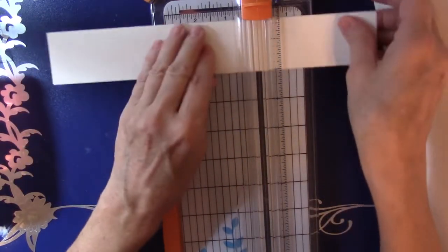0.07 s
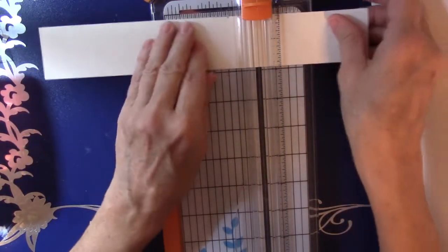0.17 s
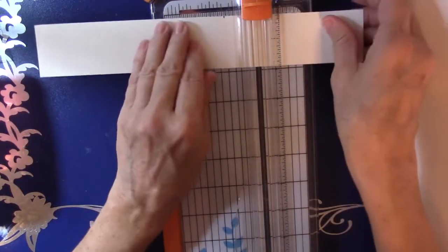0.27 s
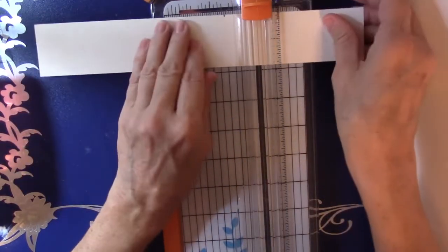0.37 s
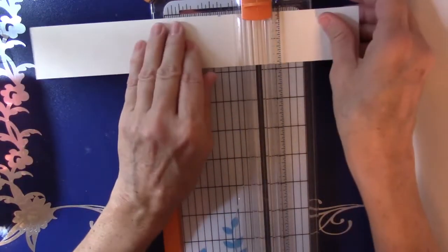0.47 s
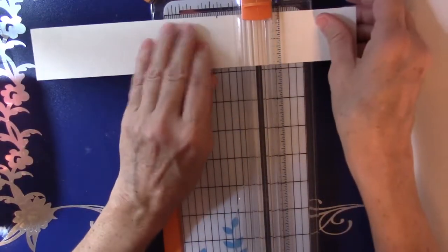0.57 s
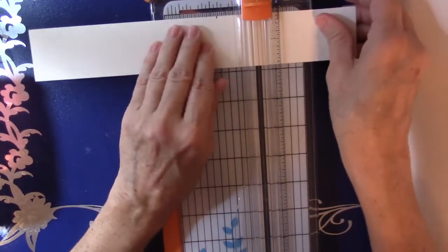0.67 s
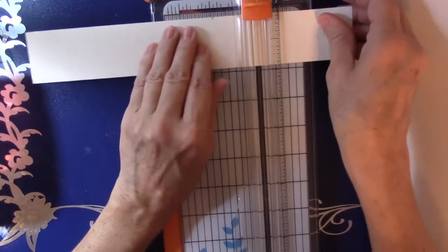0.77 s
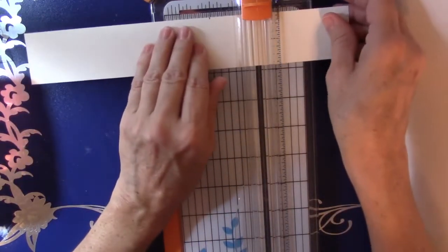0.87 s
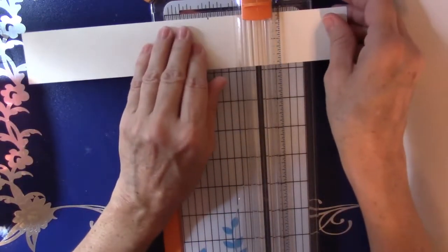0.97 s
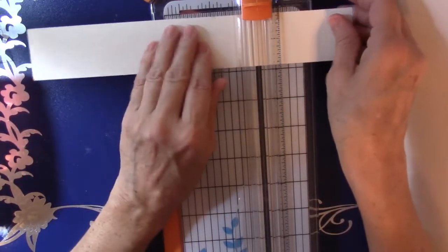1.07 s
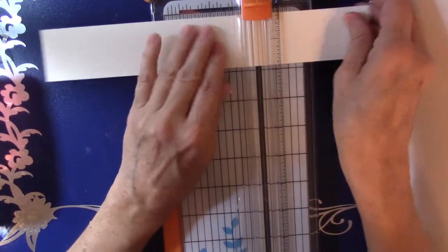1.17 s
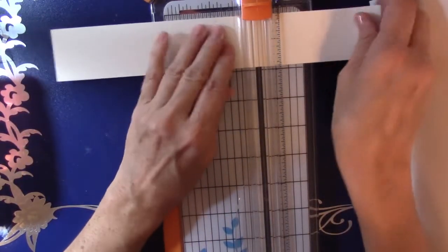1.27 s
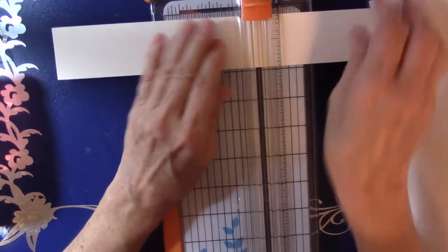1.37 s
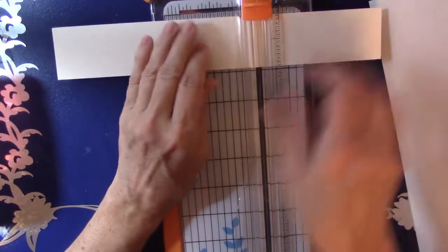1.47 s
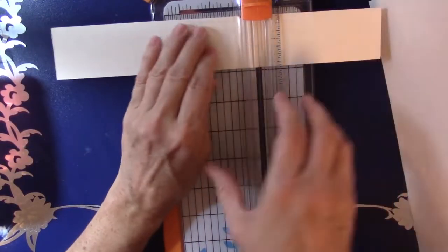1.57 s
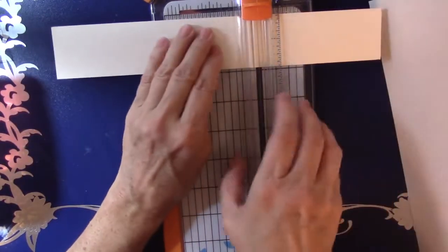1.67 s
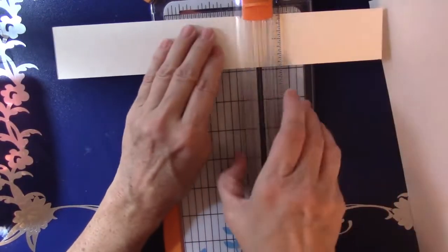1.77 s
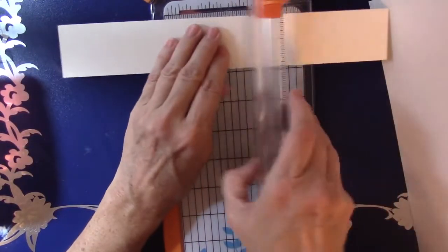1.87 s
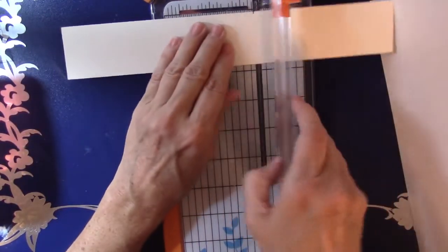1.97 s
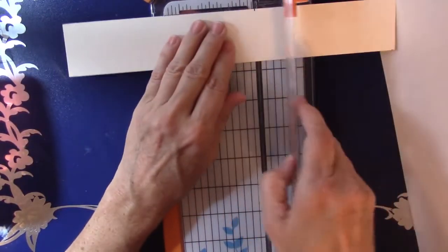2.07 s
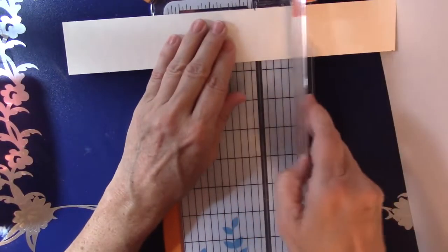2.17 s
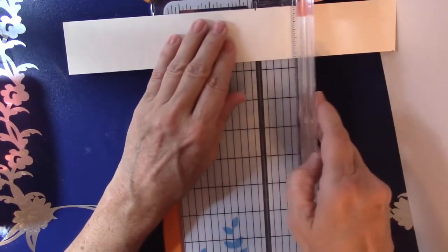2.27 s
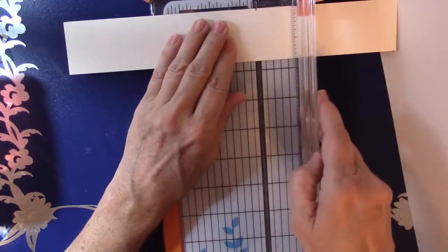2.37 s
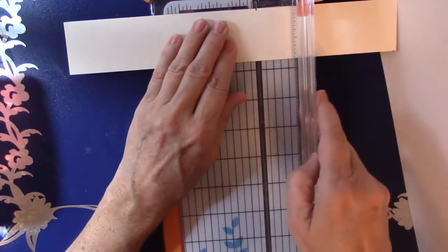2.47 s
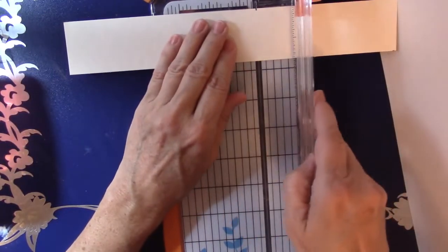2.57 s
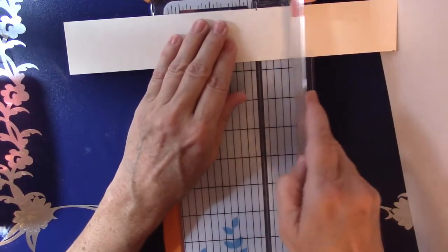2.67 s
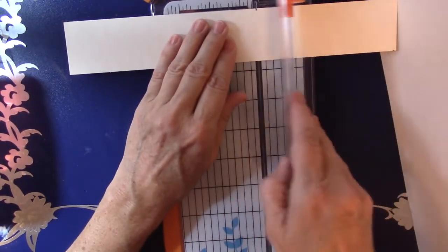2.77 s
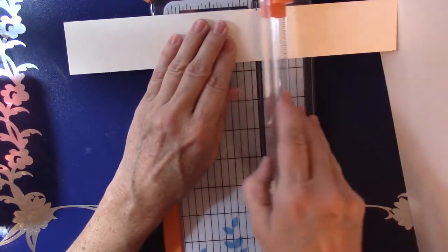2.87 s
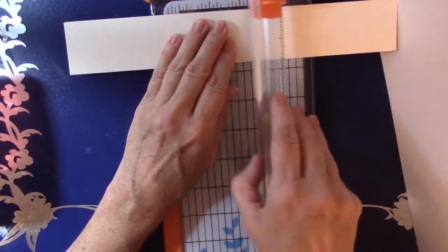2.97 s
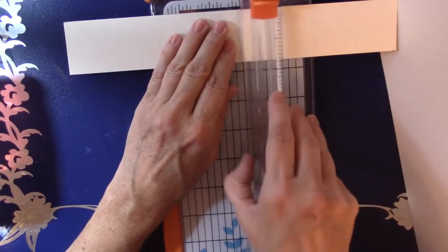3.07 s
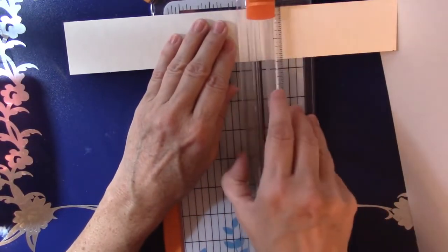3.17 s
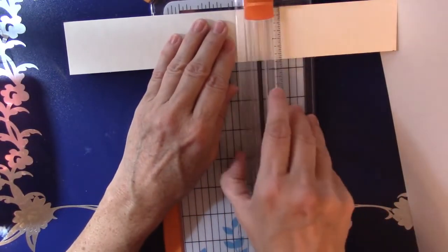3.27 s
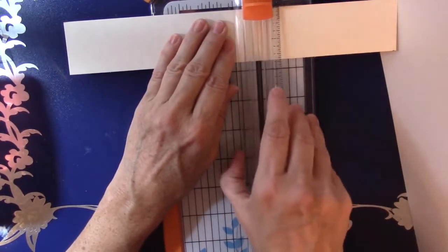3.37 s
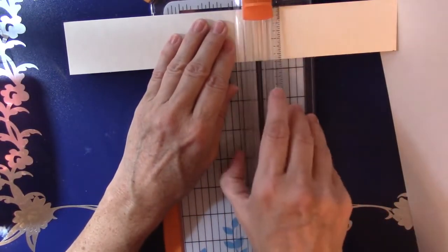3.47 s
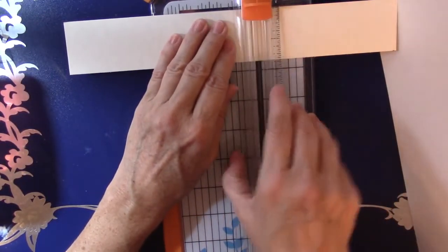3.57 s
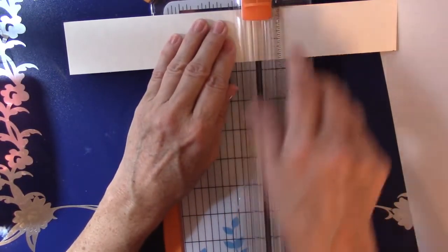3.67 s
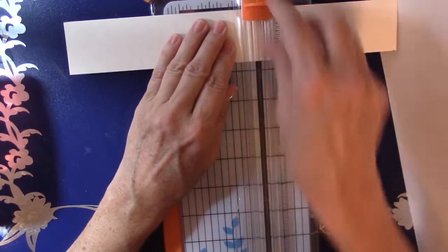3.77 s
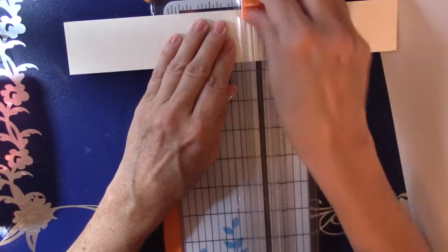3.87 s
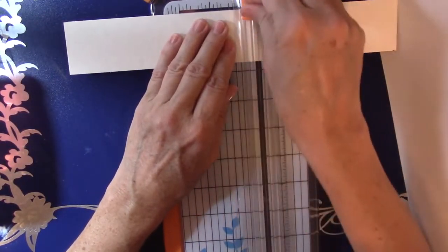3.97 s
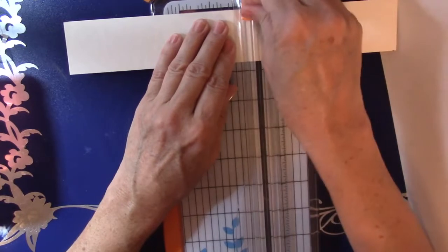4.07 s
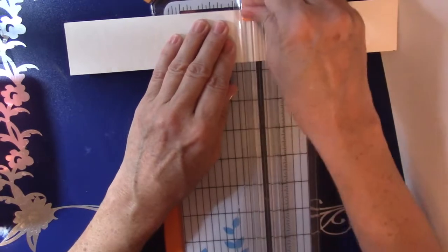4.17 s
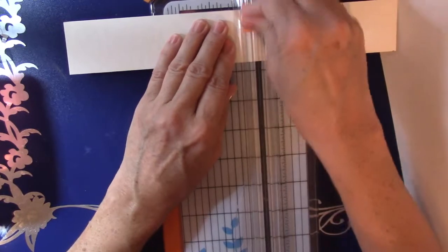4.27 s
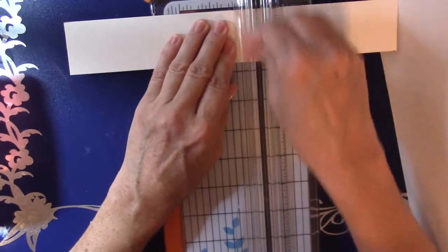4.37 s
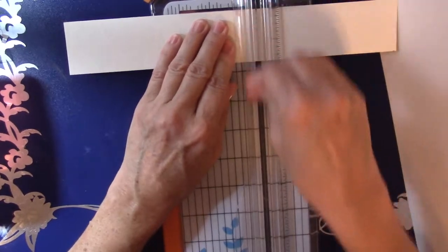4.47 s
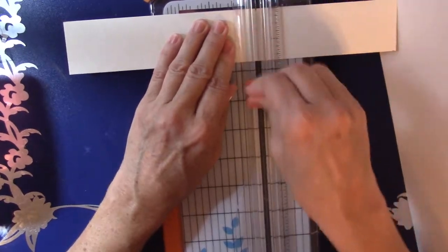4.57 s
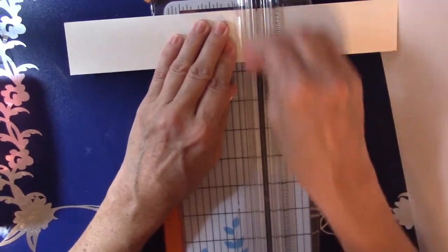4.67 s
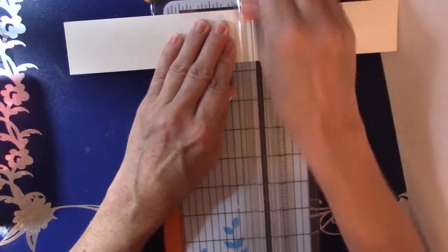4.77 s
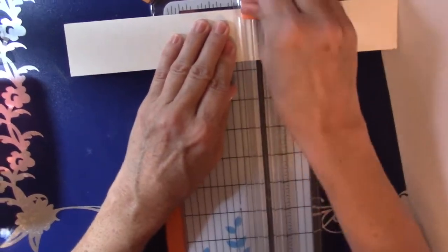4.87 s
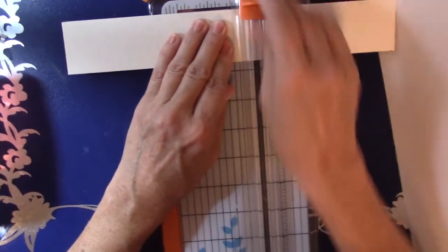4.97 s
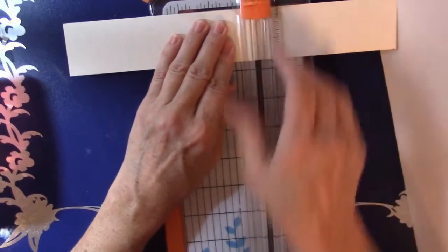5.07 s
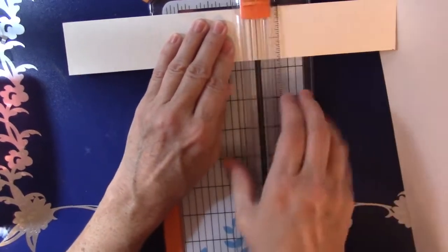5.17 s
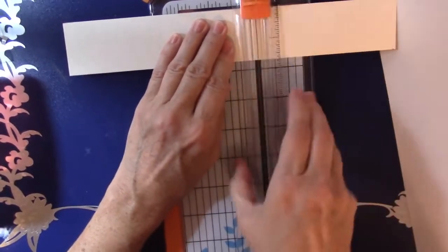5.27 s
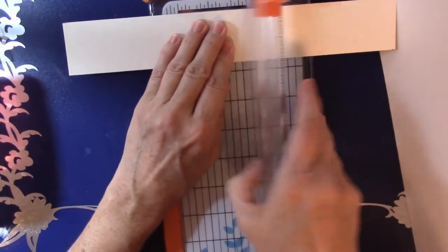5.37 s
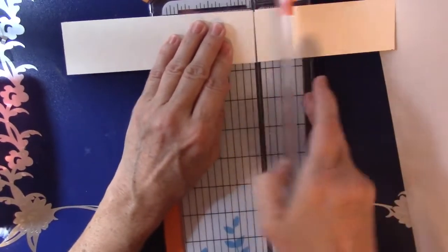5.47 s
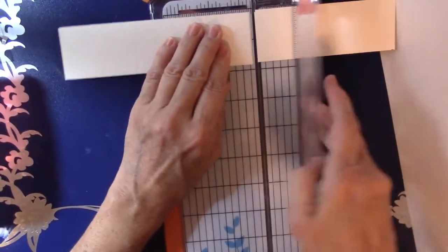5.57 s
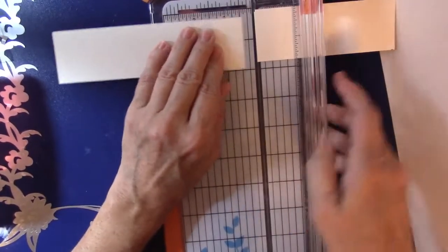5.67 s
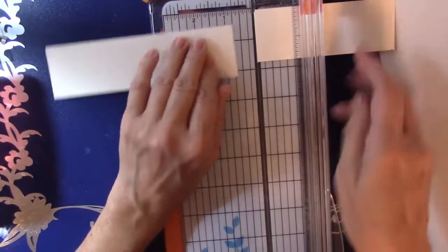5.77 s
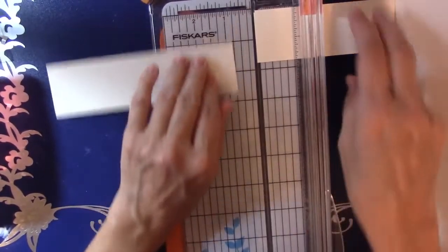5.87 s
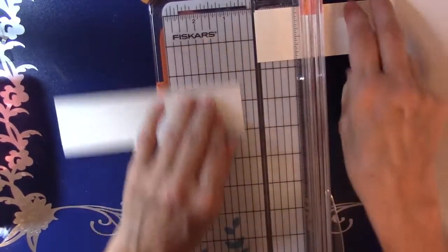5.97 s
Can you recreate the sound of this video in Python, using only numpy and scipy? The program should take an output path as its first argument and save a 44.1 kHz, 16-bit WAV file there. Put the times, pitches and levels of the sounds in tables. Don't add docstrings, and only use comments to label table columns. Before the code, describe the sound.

Light card scuffs and ticks, a hard plastic clatter, a short tearing rasp ending in a sharp snap, then soft handling in a quiet room.

```python
import sys
import numpy as np
from scipy import signal
from scipy.fft import rfft, irfft, next_fast_len
from scipy.io import wavfile
from scipy.ndimage import uniform_filter1d, map_coordinates

SR = 44100
rng = np.random.default_rng(int(sys.argv[2]) if len(sys.argv) > 2 else 0)


def how_loud(loudness_db):
    steps = np.asarray(loudness_db, float) / 20
    return 10 ** steps


def digitize_waveform(pressure):
    field = np.atleast_2d(pressure).T
    bounded = np.clip(field, -1, 1)
    quanta = np.round(bounded * 32767).astype(np.int16)
    wavfile.write(sys.argv[1], SR, quanta)


N = 265570

# pitch in Hz, level in dB per Hz.
AIR_SPECTRUM = [(12, -50.5), (40, -45), (80, -23.5), (120, -17.5), (176, -14), (205, -18), (240, -8.5),
                (265, -18), (341, -15), (650, -19), (1800, -25), (6800, -35), (9000, -43), (16000, -52)]
# pitch in Hz, likeness from 0 to 1.
AIR_LIKENESS = [(30, .3), (110, 0.72), (240, 0.79), (400, 0.46), (2000, 0.71), (8000, 0.16)]
# pitch in Hz, level in dB.
HUM = [(241, -68)]

# start in seconds, length in seconds, hiss in dB,
# swell to the end in dB, pressure on the fence in dB.
CARD_SLIDES = [(-0.02, 0.17, -55, 1, -1), (0.13, 0.13, -53, -12.5, 0), (0.27, 0.12, -74.5, 8, 2.5),
               (0.405, .13, -58, -0.5, -2.5), (0.565, 0.038, -56.5, 1, -2), (0.715, 0.048, -54.5, -5, -1.5),
               (0.755, 0.14, -54, -23, 4), (0.86, 0.067, -59.5, -4, 0.5), (1.01, 0.055, -60, 6.5, -2.5),
               (1.07, .15, -48.5, -1.5, -4.5), (1.22, 0.1, -56.5, 3, 8), (1.285, .047, -55, 4, 1),
               (1.498, 0.033, -54.5, -8, -8), (1.752, 0.033, -58, -9, -8), (1.79, 0.12, -67, 6.5, 1.5),
               (1.905, 0.35, -63.5, -7.5, 4), (2.43, 0.046, -66, -7, -19), (2.655, 0.035, -61, 2, -9),
               (2.693, 0.16, -67, -3, 6.5), (2.062, 0.038, -70, -1, -17), (3.93, 0.037, -68, -4, -5),
                (4.005, .035, -73.5, 0, -18), (4.07, 0.032, -68, -3.5, 8), (3.523, 0.033, -73.5, 18.5, 1),
                (4.886, 0.043, -55, -2.5, -4), (5.167, 0.028, -59, -8, 2.5), (5.22, .055, -59.5, -7, 1),
                (5.325, 0.081, -73.5, 19, -5), (5.398, 0.09, -59.5, 3.5, 1), (5.486, 0.04, -53.5, 5, 0.3),
                (5.53, 0.24, -60.5, 1.5, -3.5), (5.764, 0.12, -60.5, 14, -5),
                (5.884, 0.27, -47, -5.5, -3.5)]
# start in seconds, length in seconds, scuff in dB, swell to the end in dB.
PALM_RUBS = [(-0.02, 0.043, -48.5, -15), (0.1, .16, -51, -6.5), (0.26, .3, -61.5, 3),
             (0.58, 0.034, -53.5, -2), (0.62, 0.1, -61.5, 1), (0.73, 0.18, -55.5, -8.5),
             (1.03, 0.11, -60, 0), (1.23, 0.1, -61, 8), (1.74, 0.28, -65.5, 9.5), (2.04, 0.25, -61.5, -11),
             (2.63, 0.2, -64, 7), (2.9, 0.11, -70, 5), (3.53, 0.024, -60, 5.5), (4.86, 0.086, -45.5, -14),
             (5.17, 0.14, -53.5, -9), (5.31, .22, -61.5, 15), (5.53, 0.18, -54, -16),
             (5.8, 0.12, -64.5, 10)]
# pitch in Hz, level in dB per Hz.
HISS_SPECTRUM = [(2650, -46), (4500, -9.5), (6700, 5), (9770, 1), (11700, -10), (15100, -14.5),
                 (16000, -28)]
# pitch in Hz, level in dB per Hz.
DRAG_SPECTRUM = [(880, -23.5), (1500, -12.5), (1870, -6.5), (2710, -6.5), (2960, -7), (5500, -11.5),
                 (7150, -48), (12100, -120)]
# pitch in Hz, level in dB per Hz.
SCUFF_SPECTRUM = [(180, -14), (300, 1.5), (447, -9.5), (484, -9), (840, 0.5), (1680, -7), (2500, -15.5),
                  (3250, -66), (5500, -120)]
# pitch in Hz, level in dB per Hz.
SKIM_SPECTRUM = [(7000, -36.5), (11500, 4.5), (16000, -2)]

# time in
# seconds, click peak in dB, ring over the click in dB, pitch in Hz.
TICKS = [(0.1277, -46, 8, 680), (0.5174, -45, -12, 756), (0.736, -43, -12, 1020), (1.0744, -38, -10, 895),
         (1.1245, -37, -24, 1000), (1.509, -54, -30, 996), (1.6455, -42.5, 10, 1520),
         (1.651, -38, -1.5, 930), (1.6958, -42.5, -20, 900), (5.5505, -41, -9.5, 820),
         (2.438, -61, -25, 1000), (2.46, -55, -25, 1000), (1.6135, -55, 8, 860), (1.6391, -29, -4.5, 850),
         (1.672, -55, 10, 880), (1.756, -43.5, -20, 840), (2.0085, -46, 1.5, 762), (2.0747, -49, -8, 1050),
         (2.6338, -47.5, -18, 910), (2.6728, -50, -26, 496), (3.3804, -66.5, 16, 810),
         (3.892, -58, 20, 900), (3.9028, -22.5, -8.5, 1435), (3.9925, -34, -14, 1420),
         (5.5443, -31.5, -8, 837)]
# time in seconds, click peak in dB,
# ring over the click in dB, pitch in Hz.
TAPS = [(1.3344, -50, 3.5, 830), (1.6198, -33.5, 4.5, 990), (1.8158, -47.5, 6.5, 643),
        (1.9051, -43.5, -4, 696), (3.9058, -31.5, 4, 1400), (4.118, -56.5, 21, 613),
        (5.1323, -31.5, -5.5, 990), (5.155, -55.5, 14, 1010), (5.2491, -45.5, -3.5, 797),
        (5.3244, -53, 12.5, 602), (5.3444, -52, 5.5, 520), (5.5587, -26.5, -11.5, 510),
        (5.5525, -50, 19.5, 824), (5.5655, -39, 5, 2000), (5.575, -46.5, 9.5, 610),
        (5.6144, -53.5, 7.5, 516), (5.779, -58, 9, 910), (5.8992, -29.5, 3, 1154), (5.9055, -37, 6, 850),
        (5.9197, -37.5, 2.5, 517)]
# pitch in Hz, width in Hz, level in dB.
BASE_RING = [(411.4, 8.7, -3), (513, 42, -4.5), (751, 102, -1), (905, 90, -4), (1057, 310, -9),
             (1400, 150, -12), (1995, 240, -16)]
# pitch in Hz, width in Hz, level in dB.
BASE_CLICK = [(2500, 900, -3), (3500, 800, -2), (4300, 900, 0), (5300, 900, -1), (6500, 1100, -3),
              (8400, 1500, -7)]
# pitch in Hz, width in Hz, level in dB.
TABLE_THUD = [(90, 32, -11.5), (142, 29, 0), (185, 34.7, -3.5), (298, 87, -5.5)]

# start in seconds, length in seconds, pitch in Hz, peak in dB.
SQUEAKS = [
    (2.68, .14, 1220, -61),
    (2.69, .13, 2450, -65),
    (2.74, .13, 298, -60),
    (2.13, .09, 4080, -65),
    (1.668, .011, 7000, -50),
    (1.68, .005, 7000, -53),
    (1.689, .004, 6900, -55),
    (1.672, .016, 5200, -59),
    (5.22, .05, 7000, -52),
]
# time in seconds, pitch in Hz, level in dB.
GAP_TRACKS = [
    [(1.81, 553, -52), (1.9, 744, -57), (2.0, 948, -84), (2.2, 1246, -59)],
    [(5.33, 560, -32), (5.36, 700, -53.5), (5.4, 800, -55.5), (5.45, 1100, -62), (5.5, 1200, -56),
     (5.545, 1216, -50)],
]

# time in seconds, click peak in dB,
# ring over the click in dB, thud over the click in dB.
ARM_RATTLE = [
    (3.5522, -11, -7, -33),
    (3.557, -8, -15.5, -27.5),
    (3.5656, -13.5, -11.5, -14),
    (3.571, -13.5, -4, -44),
    (3.582, -19.5, -0.5, -42),
    (3.588, -22, -5.5, -7),
    (3.611, -28.5, 0, -27),
    (3.6146, -46.5, 19, -25),
    (3.6213, -29.5, 0.5, -9.5),
    (3.6724, -35.5, -2.5, -7),
]
# pitch in Hz, width in Hz, level in dB.
ARM_RING = [(850, 60, -3), (950, 60, -2), (1014, 60, 1.5), (1200, 200, -9), (1440, 170, -3), (436, 40, -14)]
# pitch in Hz, width in Hz, level in dB.
ARM_CLICK = [(2645, 38, 0.5), (3500, 160, -20), (3770, 250, -11), (5450, 1400, 10), (6360, 430, 1.5),
             (7150, 360, 10)]

# start in seconds, length in seconds, rasp in dB,
# swell to the end in dB, load on the rail in dB.
CARRIAGE_RUNS = [
    (4.16, 0.049, -74.5, 20, 7),
    (4.213, .076, -43, 4, 5.5),
    (4.289, 0.131, -38.5, 0.9, 6.5),
    (4.43, 0.083, -51, -6, -3),
    (4.57, .06, -58.5, 8, -7.5),
    (4.63, 0.13, -50, 3, -5),
]
# time in seconds, click peak in dB, ring over the click in dB,
# thud over the click in dB, pitch in Hz.
CARRIAGE_STOPS = [
    (4.2105, -29.5, -15, -6, 1470),
    (4.4257, -35.5, 5.5, 3, 716),
    (4.5518, -32.5, 6, -9, 715),
    (4.7749, -1, -13, -26, 1500),
    (4.7764, -3, -14, -26, 750),
    (4.7904, -14, -17, -20, 430),
    (4.801, -43.5, 14, -12.5, 908),
    (4.8773, -46, 8.5, -2, 887),
    (4.9697, -48, 0, -10, 974),
]
# pitch in Hz, level in dB per Hz.
RASP_SPECTRUM = [(1060, -15.5), (1800, -9.5), (2620, -19.5), (3640, -9), (4410, -12.5), (5200, -10),
                 (7630, -9.5), (16000, -26.5)]
# pitch in Hz, width in Hz, level in dB.
RAIL_NEAR = [(431, 50, -1), (740, 60, 1), (1020, 50, -17), (1520, 71, 3.5), (1810, 36, -4.5),
             (2000, 90, -1.5)]
# pitch in Hz, width in Hz, level in dB.
RAIL_FAR = [(425, 71, -3), (781, 170, 0), (1050, 75, -6), (1580, 140, 2), (1710, 40, -4), (2017, 160, 0)]
# pitch in Hz, width in Hz, level in dB.
BLADE_NEAR = [(2770, 190, 9), (3650, 90, 6), (4070, 99, 0.5), (5200, 200, 2), (5460, 70, 1),
              (6800, 91, -0.5), (7600, 90, -1), (7950, 60, -7.5), (9300, 150, -3)]
# pitch in Hz, width in Hz, level in dB.
BLADE_FAR = [(3050, 180, 6), (3610, 90, -5), (4130, 110, 0.5), (5060, 120, -1), (5870, 110, 0.5),
             (6890, 80, -4.5), (7500, 80, -3), (8260, 75, -7.5), (9980, 140, 1)]
CROSSING_S = (4.27, 4.36)
# pitch in Hz, width in Hz, level in dB.
LID_RING = [(729, 65, 0), (554, 60, -6.5), (1040, 100, -5), (1414, 33, -8.5), (1760, 120, -6),
            (936, 45, -5), (420, 52, -4.5)]
# pitch in Hz, width in Hz, level in dB.
SNAP_CLICK = [(1800, 600, -5), (3400, 600, -2), (4000, 600, 0), (5100, 600, 2), (5800, 700, 4),
              (6900, 900, 1), (8600, 1200, -3)]

# pitch in Hz, time to fade by 60 dB in seconds.
ROOM_FADE = [(150, 0.59), (1000, 0.28), (4000, 0.22), (12000, 0.12)]
# pitch in Hz, level in dB.
EAR_DIFFERENCE = [(60, -20), (200, -23.5), (700, -27.5), (1300, -28), (2400, -18.5), (4400, -16),
                  (9000, -14), (15000, -18.5)]
SILENCE_S = (4.7655, 4.7712)
# pitch in Hz, limit in dB, limit under the loudest band in dB.
MUTE_LIMITS = [(7000, -125, -70), (8500, -106, -60), (10370, -102, -41), (11800, -99, -30.5),
               (13500, -99, -28), (16200, -103, -24)]


def unit(x):
    return x / np.sqrt(np.mean(x ** 2) + 1e-20)


def along(points, hz):
    f, v = np.transpose(points)
    return np.interp(np.log(hz + 1), np.log(f + 1), v)


def wobble(rate, count=N):
    knots = rng.standard_normal(int(count * rate / SR) + 4)
    return map_coordinates(knots, [np.arange(count) * rate / SR])


def filtered(x, response):
    m = next_fast_len(x.shape[-1] + 4096)
    spectrum = rfft(x, m) * response(np.fft.rfftfreq(m, 1 / SR))
    return irfft(spectrum, m)[..., :x.shape[-1]]


def modes(table):
    def response(f):
        return sum((-1) ** k * how_loud(db) * 1j * f * width / (hz * hz - f * f + 1j * f * width)
                   for k, (hz, width, db) in enumerate(table))
    return response


def colour(spectrum):
    return lambda f: how_loud(along(spectrum, f))


def fibres(grit_db, patchy_db):
    grit = rng.standard_normal(N) * how_loud(grit_db * wobble(900))
    z = signal.stft(grit, nperseg=512)[2]
    patches = uniform_filter1d(rng.standard_normal(z.shape), size=6, axis=0)
    patches = uniform_filter1d(patches, size=8, axis=1)
    return signal.istft(z * how_loud(patchy_db * unit(patches)), nperseg=512)[1][:N]


def strokes(rows, start_s, stop_s, shares):
    t = np.arange(N) / SR
    gains = np.zeros((len(shares), N))
    for s, length, db, swell_db, *lean_db in rows:
        fade = np.clip(np.minimum((t - s) / start_s, (s + length - t) / stop_s) + 0.5, 0, 1)
        swell = how_loud(db + swell_db * np.clip((t - s) / length, 0, 1))
        gains += fade * swell * how_loud(np.multiply(shares, sum(lean_db)))[:, None]
    return gains


def even(burst):
    z = rfft(burst)
    flat = irfft(z / uniform_filter1d(np.abs(z), size=160), len(burst))
    return flat * (np.arange(len(burst)) < len(burst) - 300)


def knocks(events, body, click, wide_db, click_db, body_db, thud_db, linger, blow):
    out, t = np.zeros(N + SR), np.arange(SR // 7) / SR

    def peaked(x):
        return x / np.max(np.abs(x))

    def wide(f, hz):
        return (1j * f / hz) / (1 + 1j * f / hz) ** 2

    for s, db, rel_body_db, rel_thud_db, contact_s, hz in events:
        decay = np.clip(contact_s, 0.0004, 0.03)
        burst = rng.standard_normal((3, len(t))) * np.exp(-t / decay * [[3.2], [1 / linger], [1.6]])
        burst[:2] += 0.12 * rng.standard_normal((2, len(t))) * np.exp(-t / 0.011)
        burst[0] = even(burst[0])
        burst *= 1 - np.exp(-t / 0.00038)
        burst[:2, 2] += [0.6, blow]

        ring = body + [(hz, 0.14 * hz, 3.5)]
        edge_hz = np.clip(5500 * how_loud(-0.3 * rel_body_db), 2500, 9000)

        def click_response(f):
            dull = 1 / (1 + 1j * f / edge_hz) ** 4
            return dull * (modes(click)(f) + how_loud(wide_db) * wide(f, 5480) ** 2 * 2)

        def body_response(f):
            return modes(ring)(f) / (1 + 1j * f / 2600) + 0.5 * wide(f, 800) ** 2 / (1 + 1j * f / 2500)

        hit = how_loud(click_db) * peaked(filtered(burst[0], click_response))
        hit += how_loud(rel_body_db + body_db) * peaked(filtered(burst[1], body_response))
        hit += how_loud(rel_thud_db + thud_db) * peaked(filtered(burst[2], modes(TABLE_THUD)))
        out[round(s * SR):][:len(t)] += how_loud(db) * hit
    return out[:N]


def narrow(tracks, width):
    out = np.zeros(N)
    for rows in tracks:
        s, hz, db = np.transpose(rows)
        first = round(s[0] * SR)
        t = np.arange(first, round(s[-1] * SR)) / SR
        phase = 2 * np.pi * np.cumsum(np.interp(t, s, hz)) / SR
        a, b = (wobble(width * np.mean(hz), count=len(t)) for _ in range(2))
        gain = signal.windows.tukey(len(t), 0.15) * how_loud(np.interp(t, s, db))
        out[first:][:len(t)] += gain * (a * np.cos(phase) + b * np.sin(phase))
    return out


def air():
    def split(f):
        turn = np.arccos(np.clip(along(AIR_LIKENESS, f), -1, 1)) / 2
        return colour(AIR_SPECTRUM)(f) * [np.cos(turn), np.sin(turn)]

    noise = np.array([fibres(grit_db=0, patchy_db=0.87) for _ in range(2)])
    mid, side = filtered(noise, split)
    t = np.arange(N) / SR
    hum = sum(how_loud(db + 2 + 1.5 * wobble(6)) * np.sin(2 * np.pi * hz * t + 0.31 * wobble(4.9))
              for hz, db in HUM)
    level_db = -59.5 + 0.3 + 0.45 * wobble(3.7)
    return how_loud(level_db) * unit(np.array([mid + side, mid - side])) + hum


def card():
    start_s, stop_s = 0.026, 0.018
    hiss, drag, skim = strokes(CARD_SLIDES, start_s, stop_s, [0, 1, -0.99])
    scuff, = strokes(PALM_RUBS, start_s, stop_s, [0])
    grip = how_loud(1.36 * wobble(45))

    def rub(spectrum, patchy_db):
        return unit(grip * filtered(fibres(grit_db=1.5, patchy_db=patchy_db), colour(spectrum)))

    out = how_loud(-2.3) * hiss * rub(HISS_SPECTRUM, patchy_db=3.0)
    out += how_loud(-2.1) * drag * rub(DRAG_SPECTRUM, patchy_db=3.0)
    out += how_loud(-2.5) * scuff * rub(SCUFF_SPECTRUM, patchy_db=4.0)
    out += how_loud(-18) * skim * rub(SKIM_SPECTRUM, patchy_db=3.0)
    return out


def hands():
    events = []
    for rows, thud_db, contact_s in [(TICKS, -16, 0.006), (TAPS, -5, 0.007)]:
        for s, db, ring_db, hz in rows:
            events.append((s, db, ring_db, thud_db + 0.65 * ring_db, contact_s, hz))
    return knocks(events, BASE_RING, BASE_CLICK, wide_db=27, click_db=-2.0, body_db=3.5, thud_db=0.0,
                  linger=1.0, blow=18)


def hinge():
    edge_db = -7.5
    squeaks = [[(s, hz, db + edge_db), (s + length / 2, hz, db), (s + length, hz, db + edge_db)]
               for s, length, hz, db in SQUEAKS]
    return narrow(GAP_TRACKS, width=0.5) + 0.8 * narrow(squeaks, width=0.06)


def arm():
    contact_s, ring_hz = 0.0067, 990
    events = [(*row, contact_s, ring_hz) for row in ARM_RATTLE]
    return knocks(events, ARM_RING, ARM_CLICK, wide_db=11, click_db=-0.5, body_db=6.5, thud_db=-3.0,
                  linger=0.76, blow=6.5)


def carriage():
    edge_s = 0.014
    rasp, rail, rumble = strokes(CARRIAGE_RUNS, edge_s, edge_s, [0, 1, 0.91])
    tear = fibres(grit_db=3.6, patchy_db=1.2) * how_loud(1.5 * wobble(70))
    t = np.arange(N) / SR
    cutting = t < 4.44
    far = np.interp(t, CROSSING_S, [0, 1])

    def moving(near_part, far_part):
        return (1 - far) * unit(near_part) + far * unit(far_part)

    def singing(table):
        return filtered(tear, lambda f: colour(RASP_SPECTRUM)(f) * (1 + 2.1 * abs(modes(table)(f))))

    sing = moving(singing(BLADE_NEAR), singing(BLADE_FAR))
    blade = np.where(cutting, sing, unit(filtered(tear, colour(RASP_SPECTRUM))))
    wide = unit(filtered(tear, modes([(1090, 2000, 0)])))
    rail_ring = moving(filtered(tear, modes(RAIL_NEAR)), filtered(tear, modes(RAIL_FAR)))
    shake = np.where(cutting, rail_ring + 0.4 * wide, wide)
    low = unit(filtered(rng.standard_normal(N), lambda f: modes(TABLE_THUD)(f) * f / (f + 60)))

    contact_s = 0.006
    events = [(*row[:-1], contact_s, row[-1]) for row in CARRIAGE_STOPS]
    stops = knocks(events, LID_RING, SNAP_CLICK, wide_db=14, click_db=-2.0, body_db=4.5, thud_db=0.0,
                   linger=0.63, blow=23)
    return rasp * blade + how_loud(-0.1) * rail * shake + how_loud(-8.5) * rumble * low + stops


def ports(x):
    scatter = rng.standard_normal(900) * np.exp(-np.arange(900) / 200)
    scattered = signal.fftconvolve(x, scatter / np.linalg.norm(scatter))[:N]
    side = filtered(scattered, colour(EAR_DIFFERENCE))
    return np.array([x * how_loud(1.0) + side, x * how_loud(0.92) - side])


def room(x):
    out, step = np.zeros((2, N + SR)), SR // 2
    for i in range(0, N, step):
        hz, t, z = signal.stft(rng.standard_normal((2, SR // 2)), SR, nperseg=256)
        fade = how_loud(-60 * t / along(ROOM_FADE, hz)[:, None])
        tail = signal.istft(z * fade, SR, nperseg=256)[1]
        tail = tail[0] + 0.14 * tail[1] * [[1], [-1]]
        wet = signal.fftconvolve(x[None, i:i + step], tail / np.linalg.norm(tail[0]), axes=1)
        out[:, i + 200:i + 200 + wet.shape[1]] += wet
    return out[:, :N]


def muted(x):
    hz, _, z = signal.stft(x, SR, nperseg=2048)
    power = np.abs(z[:, :-1].mean(0)) ** 2
    band = np.repeat(power.reshape(-1, 32, power.shape[-1]).mean(1), 32, axis=0)
    faint, masked = (how_loud(2 * along([(row[0], row[k]) for row in MUTE_LIMITS], hz[:-1]))[:, None]
                     for k in (1, 2))
    loudest = band.max(0)
    loudest = np.minimum(loudest, np.roll(loudest, 2))
    z[:, :-1] *= band > np.maximum(faint, masked * loudest)
    return signal.istft(z, SR, nperseg=2048)[1][:, :N]


def scene():
    near = card() + hands() + hinge() + arm() + carriage()
    return ports(near) + how_loud(-13.0) * room(near) + air()


def band_limit(x):
    return signal.sosfilt(signal.butter(12, 16820, fs=SR, output="sos"), x)


def record(dry):
    t = np.arange(N) / SR
    outside_s = np.maximum(SILENCE_S[0] - t, t - SILENCE_S[1])
    kept = np.clip(outside_s / 0.0008 + 0.5, 0, 1)
    limited = filtered(dry * kept, lambda f: f < 15900)
    return band_limit(muted(limited))


dry = scene()
out = record(dry)
digitize_waveform(out)
```